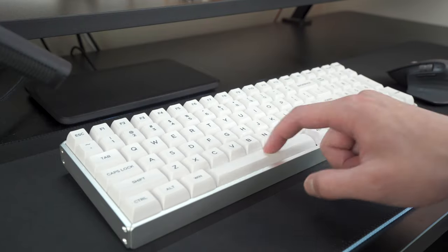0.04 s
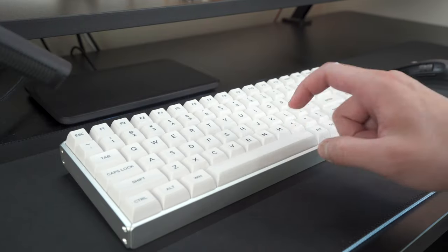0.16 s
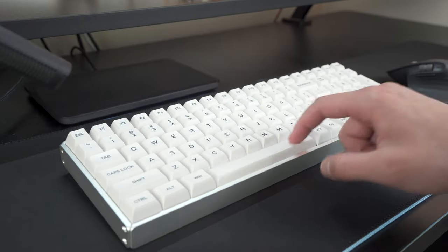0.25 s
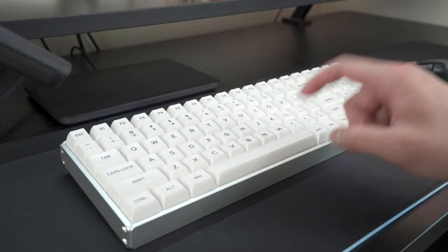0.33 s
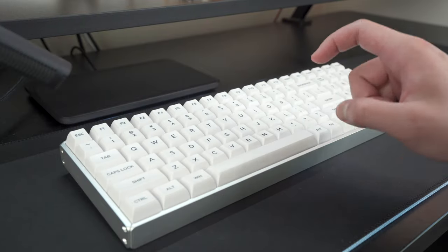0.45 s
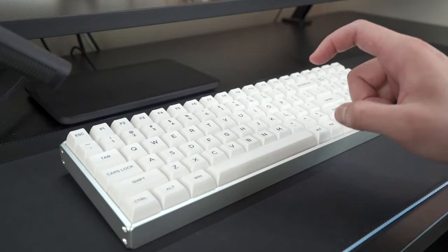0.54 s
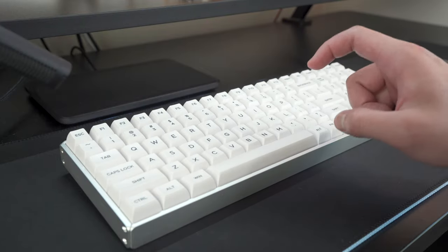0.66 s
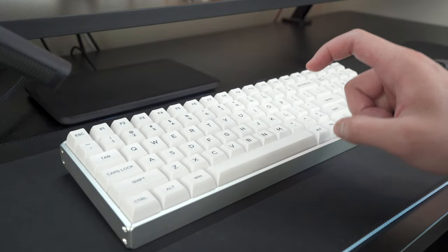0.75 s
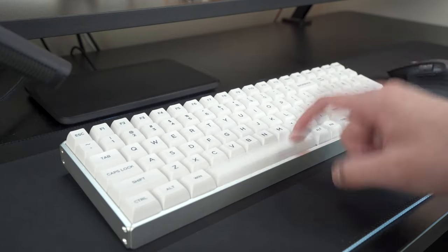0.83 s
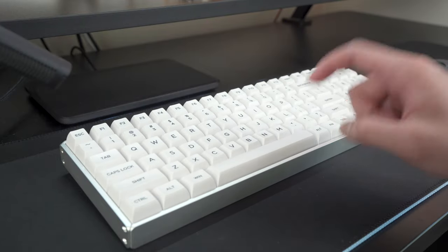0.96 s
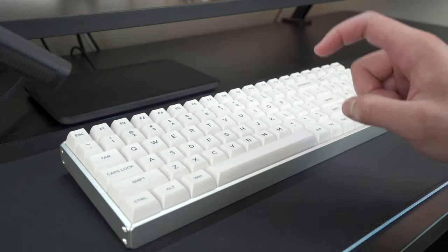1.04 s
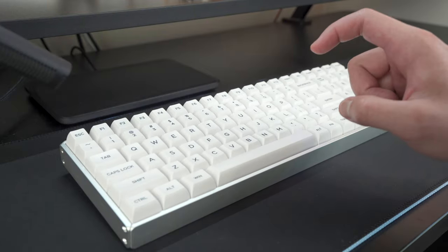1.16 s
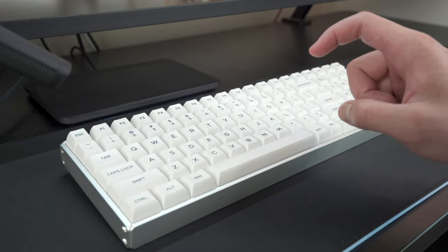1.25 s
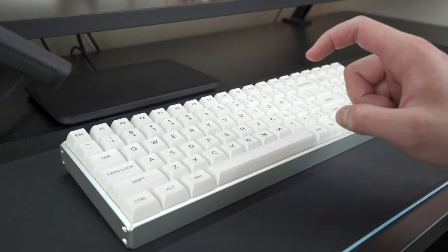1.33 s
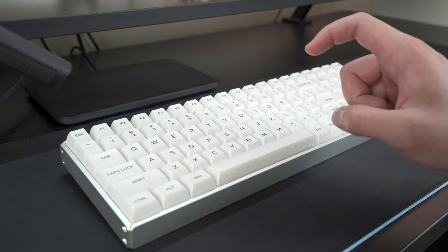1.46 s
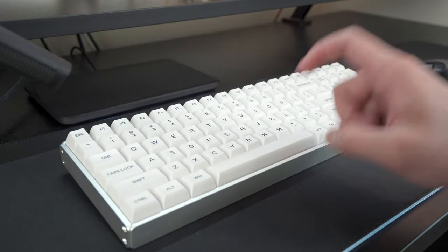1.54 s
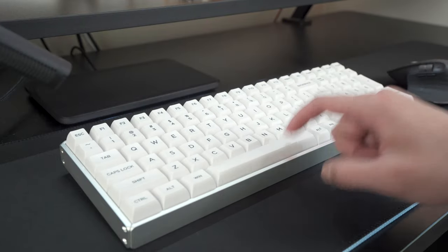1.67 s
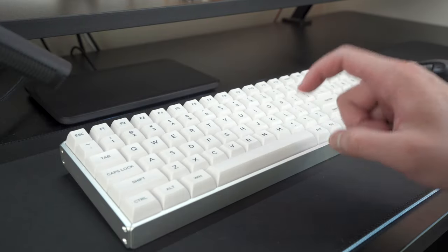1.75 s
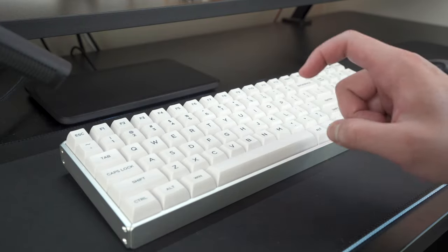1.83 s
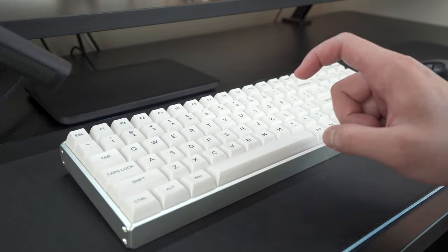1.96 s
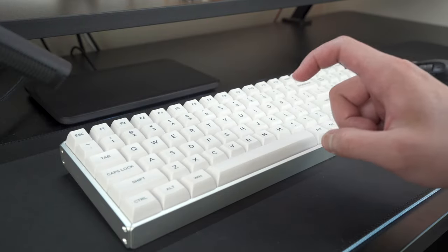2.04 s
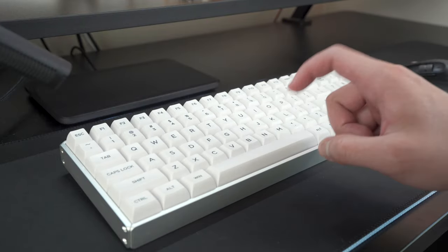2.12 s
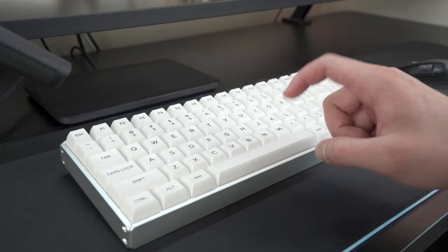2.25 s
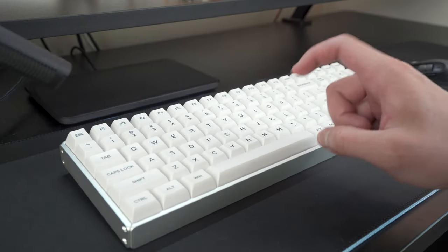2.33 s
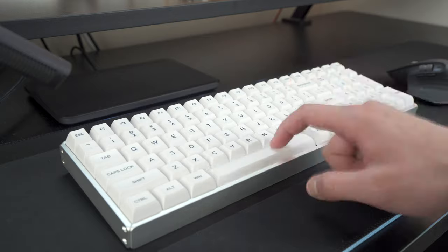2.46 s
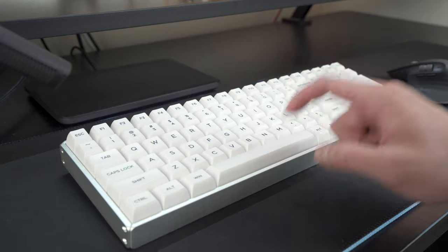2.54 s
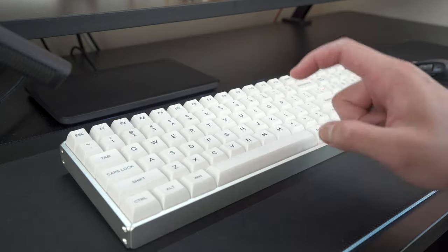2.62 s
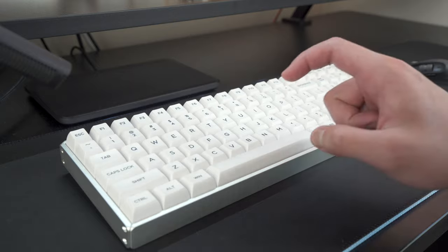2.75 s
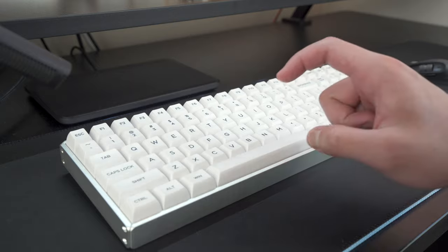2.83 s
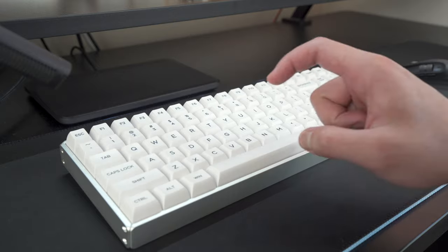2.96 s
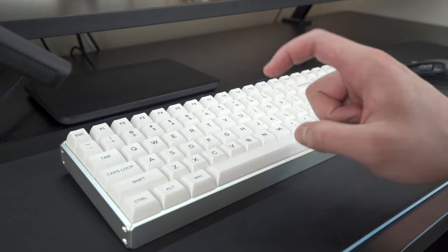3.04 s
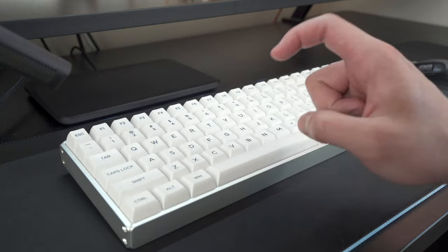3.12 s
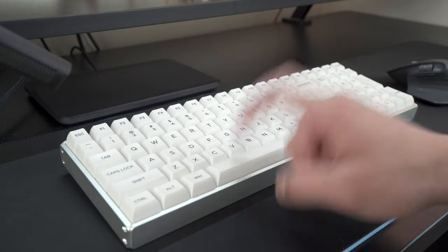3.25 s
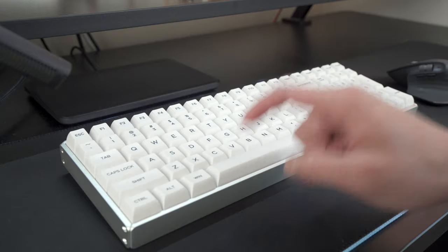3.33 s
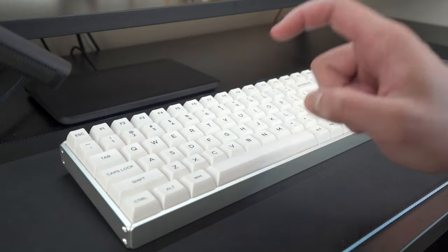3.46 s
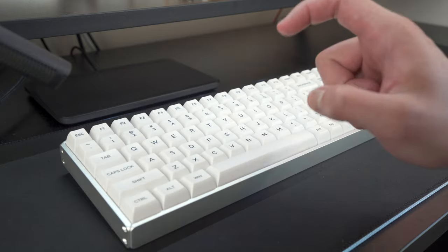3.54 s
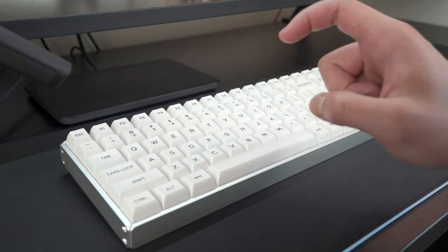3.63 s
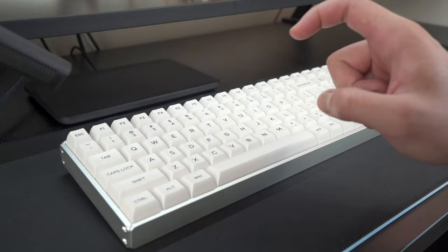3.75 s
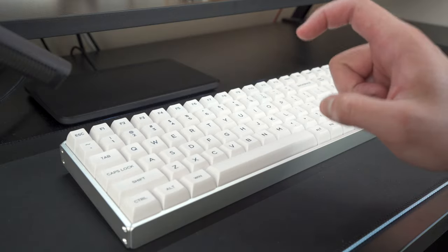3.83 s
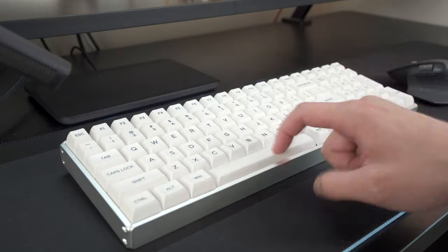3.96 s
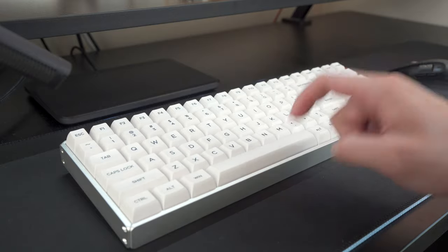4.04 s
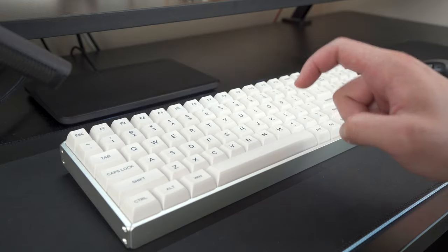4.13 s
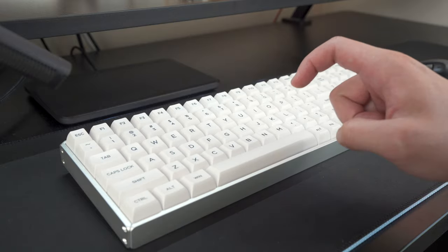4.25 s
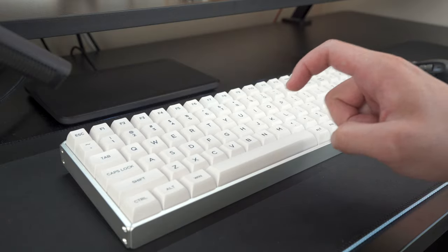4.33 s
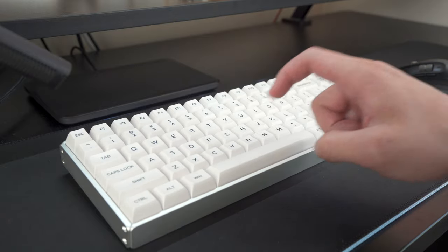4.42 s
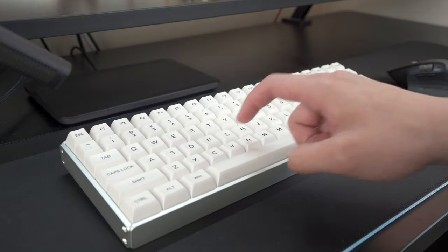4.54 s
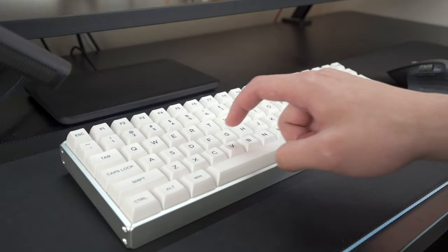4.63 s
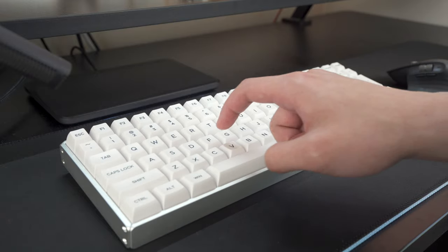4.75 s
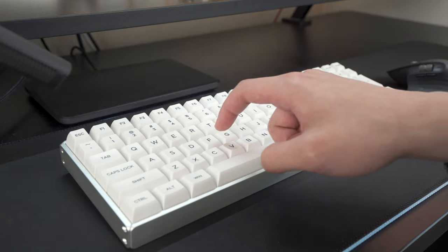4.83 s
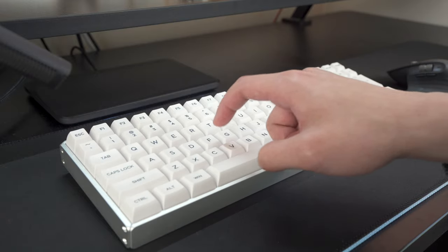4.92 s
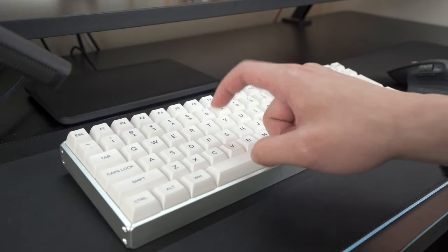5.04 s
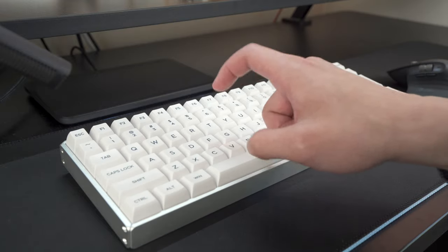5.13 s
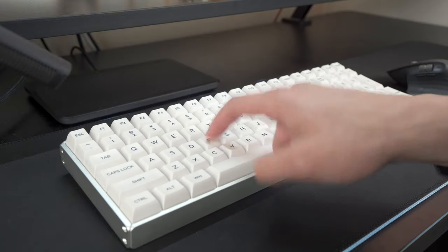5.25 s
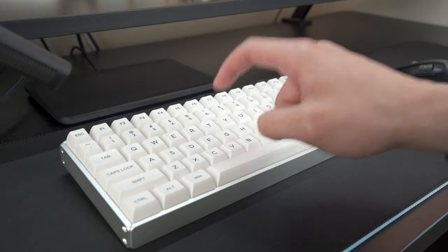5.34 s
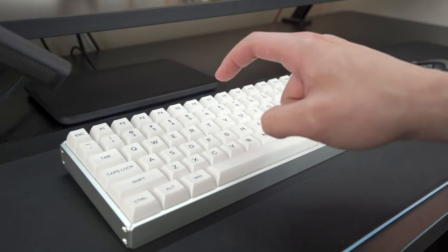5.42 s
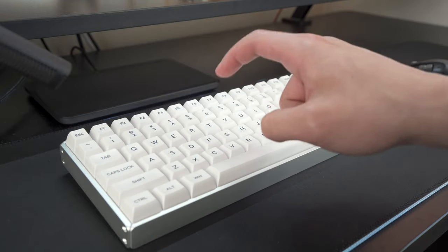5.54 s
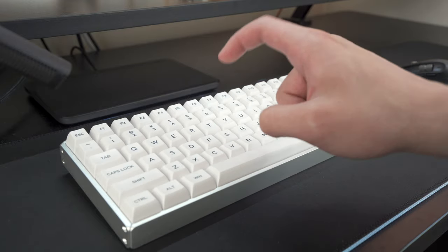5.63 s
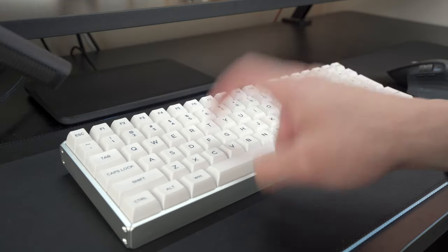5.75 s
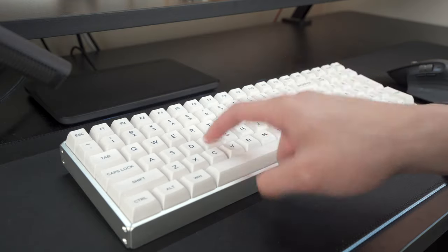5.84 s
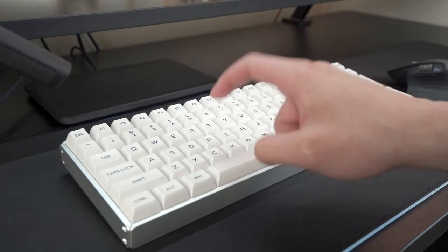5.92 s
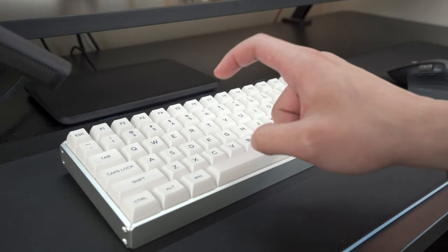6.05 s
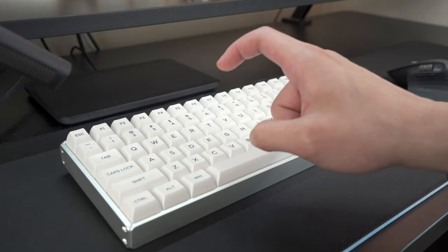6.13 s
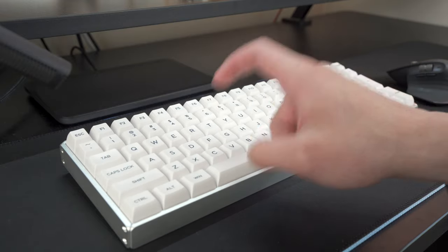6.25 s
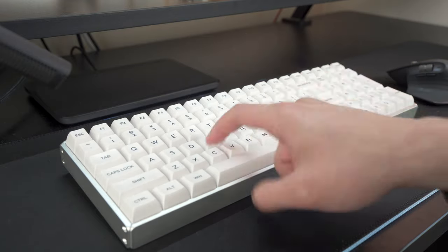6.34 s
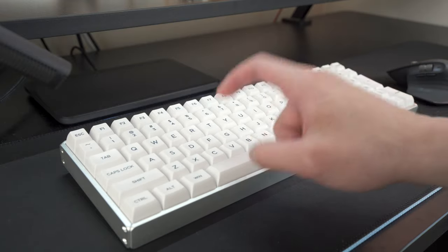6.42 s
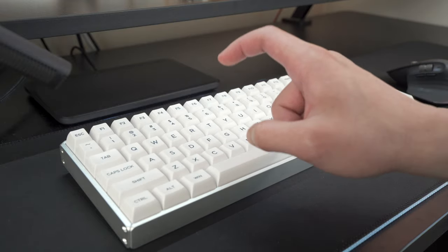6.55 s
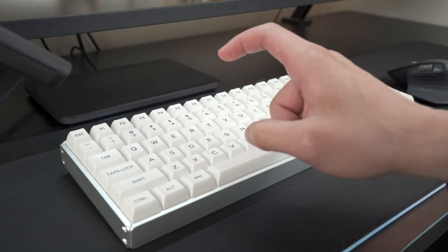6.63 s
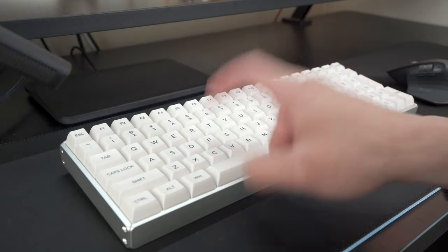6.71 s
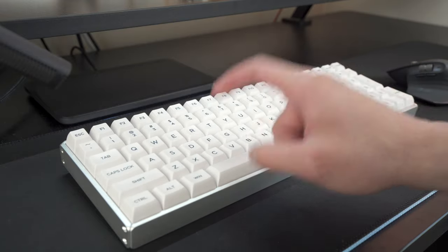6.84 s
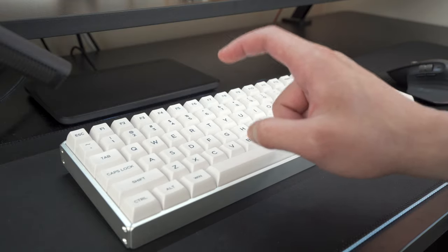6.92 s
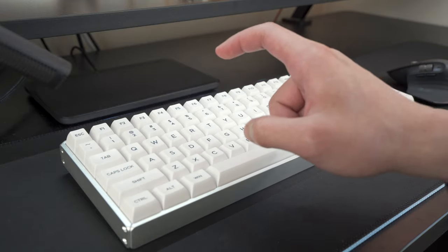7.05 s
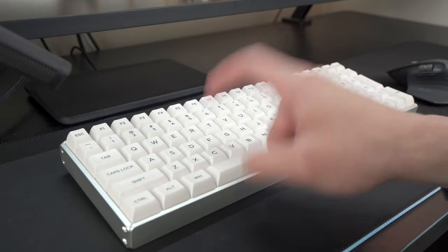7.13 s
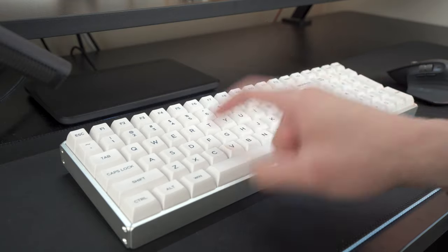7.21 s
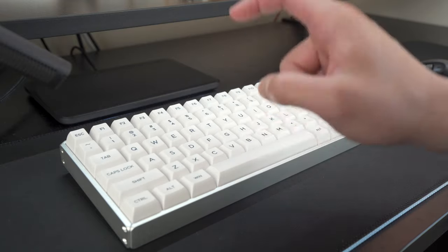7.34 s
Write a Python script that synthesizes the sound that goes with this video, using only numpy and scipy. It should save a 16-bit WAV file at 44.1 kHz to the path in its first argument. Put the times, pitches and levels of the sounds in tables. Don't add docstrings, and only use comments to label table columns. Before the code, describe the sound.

Very close to a metal-cased mechanical keyboard in a quiet room, a finger presses the long bar repeatedly: plastic scrape, hard rattly clack, low desk thump, then a bright snap back with tiny bounces. Then five letter keys sound sharper and tighter. A thin metallic ring lingers after each push, over faint room hum.

```python
import sys
import numpy as np
from scipy import signal
from scipy.fft import rfft, irfft
from scipy.io import wavfile
from scipy.ndimage import uniform_filter1d

SR = 44100
rng = np.random.default_rng(int(sys.argv[2]) if len(sys.argv) > 2 else 0)


def invert_db(level):
    return 10 ** (np.asarray(level, dtype=float) / 20)


def log_audio(samples):
    frames = np.atleast_2d(samples).T
    limited = np.clip(frames, -1, 1)
    pcm = np.round(limited * 32767).astype(np.int16)
    wavfile.write(sys.argv[1], SR, pcm)


N = 325458
LEAD = 2205

# frequency in Hz, level in dB per Hz.
HUM_TONE = [(22, 0), (45, -2), (80, 5), (118, -8), (146, -3.5), (170, -8.5), (220, -9), (370, -10.5),
            (590, -10), (1000, -16), (1250, -13), (1900, -15), (5200, -28), (8000, -37.5), (15700, -40),
            (15900, -61.5)]
# frequency in Hz, t60 in seconds.
CLATTER_DECAY = [(300, 0.228), (2000, 0.0377), (8000, 0.0746), (16000, 0.0005)]
WALL_DECAY = [(200, 0.17), (1500, 0.52), (5000, 0.34), (9000, 0.27), (13000, 0.2), (16000, 0.18)]
# frequency in Hz, level in dB per Hz.
SPREAD_TONE = [(150, -28.5), (400, -25), (550, -5), (1800, 3), (4000, -3), (8500, -15.5), (12000, -12.5),
               (16300, -18.5)]
# frequency in Hz, level in dB, t60 in seconds.
DESK_MODES = [(52, 0, .33), (63, -10, .15), (44, -9, .5), (31, -18, .6), (95, -11, .08), (140, -12, .05)]
BAR_RING_MODES = [(261, 7, .36), (553, -9, 2.4), (590, -7.5, 1.7), (1220, -15, 1.5), (1631, -3, 1.0),
                  (1730, 1, .5), (2191, -1, .25), (2627, -12, .5), (4027, -14, .5), (4980, -16, .7),
                  (8150, -21, .5), (9600, -19, .45)]
KEY_RING_MODES = [(554, -13, 2.4), (1066, -4, .3), (1220, -19, 2.5), (1631, -15, .9), (1717, 0, .5),
                  (2385, -10, .2), (4455, -17, .5), (7210, -14, .35), (8156, -19, .6), (8457, -18, .55),
                  (9335, -18, .55), (9600, -19, .5), (12920, -19, .3), (13000, -19, .3)]
# frequency in Hz, level in dB per Hz.
RUB_TONE = [(120, -23.5), (400, -5.5), (1760, -9.5), (2890, -2.5), (6040, -4), (9390, -11), (12600, -8),
            (16300, -18.5)]
# frequency in Hz, level in dB per Hz.
BAR_DOWN_COLOUR = [(120, -45.5), (400, -30.5), (520, -16), (800, -23), (1300, -3.5), (2050, 0.5),
                   (3000, -6.5), (3700, -9.5), (5100, -3.5), (6300, -9), (7800, -7), (9400, -11),
                   (10900, -13.5), (16300, -22.5)]
KEY_DOWN_COLOUR = [(120, -25), (350, -29), (600, -14), (1790, 1.5), (3300, -6.5), (4840, 3.5), (6700, -7.5),
                   (8410, 4.5), (10700, -6), (11600, -22.5), (14600, -13), (16300, -31)]
BAR_UP_COLOUR = [(120, -42), (350, -26), (800, -21.5), (1300, -5.5), (2070, -4.5), (2700, -8.5),
                 (4030, -9.5), (5000, -9.5), (7810, -1), (10900, -6.5), (11700, -20), (13800, -15.5),
                 (16300, -30)]
KEY_UP_COLOUR = [(120, -57), (200, -53.5), (975, -8.5), (2790, -5.5), (4180, -2.5), (5930, -7.5),
                 (6620, -11), (8260, 2.5), (9050, -8), (11700, -16.5), (14300, -10.5), (16300, -36.5)]
# frequency in Hz, level in dB, t60 in seconds.
BAR_DOWN_BODY = [(260, -8, .12), (487, 2, .05), (545, -7, .04), (615, -4, .045), (1000, -11, .03),
                 (1240, -6, .04), (1350, -7, .04), (1570, -8, .035), (1930, 3, .03), (2075, 5, .035),
                 (2410, -10, .03), (2860, -9, .025), (3950, -9, .02), (5050, -8, .02), (5280, -8, .02)]
KEY_DOWN_BODY = [(514.97, -14, 0.03), (688, -9, 0.029), (1291.9, -1, 0.026), (1763.6, -1.5, .035),
                 (1991.8, -3, 0.046), (2413.2, -4, 0.049), (2947.2, -10.5, 0.049), (3900, -15, 0.032),
                 (5223.7, -8, .035), (5702.5, -10, .04), (8263.1, -13.5, .035)]
BAR_UP_BODY = [(529.78, -9.5, 0.047), (605.56, -15, 0.067), (1044.4, -22.5, .05), (1380, -13, 0.058),
               (1484.9, -13, 0.065), (1703, -12, .06), (2123.3, -0.5, 0.057), (4133.6, -15, 0.032),
               (5140.3, -16, 0.026), (6240, -14, .03), (7082.7, -14, 0.016), (7790, -8, 0.0097),
               (8547, -10, 0.013), (10550, -13.5, 0.0088)]
KEY_UP_BODY = [(700, -7, .04), (850, -3, .06), (980, -3, .06), (1066, -3, .07), (1300, -4, .04),
               (2300, -10, .04), (2830, -14, .04), (3840, -12, .03), (4240, -5, .02), (6840, -16, .04),
               (8300, -8, .04), (9570, -20, .05)]
# start in seconds, length in seconds, level in dB, slips per second.
FINGER_SCUFF = (6.31, .13, -66, 85)
# time in seconds, blow in dB, ring in dB.
BAR_LOOSE = [
    (.8, -12, -3),
    (1.559, -0.5, 1.3005),
    (1.564, -18, 2.5),
    (2.4173, -9, 4.5),
    (2.4175, -6, 3),
    (2.4213, -26, -12),
    (3.2311, -13.5, -2.5),
    (3.8962, -.5, 5),
    (3.9, -6.5, 1),
    (3.9076, -27, -3.5),
]
KEY_LOOSE = [
    (5.152, -8.5, -33),
    (5.2009, -20, -5.5),
    (5.7244, -10, -7),
    (5.7293, -28, 6.5),
    (5.739, -19, 6),
    (6.262, -17, -3.5),
    (6.2733, -20, 4.5),
    (6.6944, -14, 7.5),
    (6.7027, -26.5, -2.5),
]
# time in seconds, blow in dB, first flight in ms, loss at the bounce in dB, desk in dB.
BAR_RISES = [
    (0.0372, 1.5, 13.8, 10, -31),
    (.2291, .5, 14.6, 9, -26.5),
    (0.8408, 3.5, 15.4, 10, -24.5),
    (1.6128, 2.5, 14.9, 9, -24),
    (2.456, 3, 17.5, 9.5, -21),
    (3.2516, 1, 14.7, 16, -29.5),
    (3.9499, 4, 15.5, 12, -25.5),
]
KEY_RISES = [
    (5.2141, -5, 5.5, 16, -32.5),
    (5.7934, -5, 5.6, 13.5, -35),
    (6.3047, -6, 5.5, 34, -32.5),
    (6.7284, -5.5, 3.7, 41, -41.5),
    (7.142, -8, 5.4, 17, -25.5),
]
NEIGHBOUR_RISES = [
    (5.1757, -3.5, 10, 12, -32),
]
# time in seconds, travel in ms, blow in dB, ring in dB, push on the desk in dB.
BAR_STROKES = [
    (-.011, 6, -10, -5, -22.5),
    (0.1827, 9.2, -2.5, -1.5, -23.5),
    (0.7922, 6.6, 7, -3.5, -16.5),
    (1.5537, 5.8, 8, -6.5, -16.5),
    (2.4093, 5.8, 5.5, -2.5, -17),
    (3.2274, 7.5, 2, 2.5, -19.5),
    (3.895, 4.9, 5.5, -4.5, -15.5),
]
KEY_STROKES = [
    (5.1544, 6, 6.9, -2, -17),
    (5.7279, 4, 8.3, 4.5, -17.5),
    (6.2643, 5.3, 4.2, -6.5, -22.5),
    (6.6944, 4.6, 8.3, 0, -22.5),
    (7.1176, 4.6, 4.4, 0, -24),
]


def evened(x):
    return x / np.sqrt(np.mean(x ** 2) + 1e-20)


def read(points, hz):
    f, value = np.transpose(points)
    return np.interp(np.log(hz + 1), np.log(f + 1), value)


def add(mix, s, sound):
    part = mix[round(s * SR) + LEAD:][:len(sound)]
    part += sound[:len(part)]


def through(x, response):
    return signal.fftconvolve(x, response)[:len(x)]


def causal(tone):
    db = np.maximum(read(tone, abs(np.fft.fftfreq(2048, 1 / SR))), -60)
    log_spectrum = np.conj(signal.hilbert(np.log(invert_db(db))))
    h = np.fft.ifft(np.exp(log_spectrum)).real[:1024]
    return h / np.linalg.norm(h)


def modes(table, size=4096):
    t = np.arange(size) / SR
    return sum(invert_db(db - 60 * t / t60) * np.sin(2 * np.pi * hz * t) for hz, db, t60 in table)


def hum():
    frames, hz = N // 512 + 5, np.fft.rfftfreq(2048, 1 / SR)
    real, imaginary, patches = rng.standard_normal((frames, 1025, 3)).T
    patches = evened(uniform_filter1d(uniform_filter1d(patches, 6, 0), 8, 1))
    z = (real + 1j * imaginary) * invert_db(read(HUM_TONE, hz)[:, None] + 1.2 * patches)
    air = signal.istft(z, nperseg=2048, noverlap=1536)[1][:N]
    return invert_db(-53) * evened(air)


def tail(decays, gap_s):
    hz, t, z = signal.stft(rng.standard_normal(SR // 2), SR, nperseg=128)
    fading = z * invert_db(-60 * t / read(decays, hz)[:, None])
    h = signal.istft(fading, SR, nperseg=128)[1]
    return np.r_[np.zeros(round(gap_s * SR)), h / np.linalg.norm(h)]


def reflections(keys):
    sent = 0.38 * keys[0] + invert_db(5) * through(keys[1], causal(SPREAD_TONE))
    near = through(sent, invert_db(-11) * tail(CLATTER_DECAY, 0.0011))
    walls = through(sent, invert_db(-23.5) * tail(WALL_DECAY, 0.0065))
    return near + walls


def desk(push, jolt):
    t = np.arange(SR) / SR
    body = modes(DESK_MODES, size=SR)
    swing = body * (1 - np.exp(-t / .003))
    quick = body * (1 - np.exp(-t / .0015)) * (.3 + .7 * invert_db(-60 * t / 0.19))
    return through(push, swing) + through(jolt, quick)


def long_rings(bar, letter):
    after_bar = invert_db(-49.5) * through(bar, modes(BAR_RING_MODES, size=2 * SR))
    after_letter = invert_db(-47.5) * through(letter, modes(KEY_RING_MODES, size=2 * SR))
    return after_bar + after_letter


def scrape(pressure):
    rub = rng.standard_normal(8192)[:len(pressure)] * pressure
    return evened(through(rub, causal(RUB_TONE)))


def scuff(mix):
    s, length_s, db, slips_hz = FINGER_SCUFF
    t = np.arange(length_s * SR) / SR
    stroke = np.sin(np.pi * (t / length_s) ** .6)
    slips = .6 + np.cos(np.pi * slips_hz * t) ** 4
    hiss = scrape(stroke * slips)
    add(mix, s, invert_db(db) * evened(np.diff(hiss, 2)))


def rattle(ms):
    u = np.arange(2048) / SR * 1000 / max(ms, .05)
    shape = np.exp(-u ** 2) + 0.21 * np.exp(-u / 3)
    x = rng.standard_normal(len(u)) * np.sqrt(rng.exponential(1, len(u))) * shape
    x[0] = -2
    z = rfft(x)
    x = irfft(z / abs(z) ** .8)[:1024] * shape[:1024] ** .3
    return x * np.sqrt(ms) / np.linalg.norm(x)


def strike(mix, s, db, ms, tone, body, body_db):
    hits = rattle(ms)
    low_cut = signal.butter(3, 430, "high", fs=SR)
    ringing = signal.lfilter(*low_cut, signal.fftconvolve(hits, body))
    add(mix[0], s, invert_db(db + 11.5) * signal.fftconvolve(hits, tone))
    add(mix[0], s, invert_db(db + body_db) * ringing)
    add(mix[1], s, invert_db(db) * hits)


def knocks(mix, rows, tone, body, body_db):
    for s, db, ring_db in rows:
        strike(mix, s, db, .46, tone, body, ring_db + body_db)


def returns(mix, low, rows, tone, body, body_db, rattle_ms, dull_db):
    for s, db, flight_ms, loss_db, desk_db in rows:
        rub = scrape(np.arange(700) / 700 + .2)
        add(mix[0], s - 700 / SR, invert_db(db - 41) * rub)
        strike(mix, s, db, rattle_ms, tone, body, body_db)
        add(low, s, -invert_db([desk_db]))
        for flights, losses in ((1, 1), (1.49, 2.1)):
            at = s + flights * flight_ms / 1000
            strike(mix, at, db - losses * loss_db, rattle_ms, tone, body, body_db - dull_db)
            add(low, at, -invert_db([desk_db - 16.5]))


def presses(mix, low, ring, rows, tone, body, body_db, rattle_ms, slide_db):
    for bottom, travel_ms, db, ring_db, desk_db in rows:
        t = np.arange(travel_ms * SR / 1000) / SR
        touch = 0.29 * np.exp(-t / .0004)
        slide = 0.15 + 1.7 * (t / t[-1]) ** 1.4
        add(mix[0], bottom - len(t) / SR, invert_db(desk_db + slide_db) * scrape(touch + slide))
        tightened_ms = rattle_ms * invert_db(-0.42 * db)
        strike(mix, bottom, db, tightened_ms, tone, body, body_db + ring_db)
        add(low, bottom - .004, -invert_db([desk_db]))
        add(ring, bottom, invert_db([14 + desk_db / 2]))


def scene():
    push, jolt, bar, letter = np.zeros((4, N + LEAD))
    keys = np.zeros((2, N + LEAD))
    bar_down = causal(BAR_DOWN_COLOUR), modes(BAR_DOWN_BODY)
    key_down = causal(KEY_DOWN_COLOUR), modes(KEY_DOWN_BODY)
    bar_up = causal(BAR_UP_COLOUR), modes(BAR_UP_BODY)
    key_up = causal(KEY_UP_COLOUR), modes(KEY_UP_BODY)
    presses(keys, push, bar, BAR_STROKES, *bar_down, -18, rattle_ms=3.3, slide_db=-6.5)
    presses(keys, jolt, letter, KEY_STROKES, *key_down, -24.5, rattle_ms=1.1, slide_db=-3)
    returns(keys, push, BAR_RISES, *bar_up, -9.0, rattle_ms=.42, dull_db=4.6)
    returns(keys, jolt, KEY_RISES, *key_up, -19.5, rattle_ms=.8, dull_db=.3)
    knocks(keys, BAR_LOOSE, *bar_down, -8.5)
    knocks(keys, KEY_LOOSE, *key_down, -21.0)
    returns(keys, push, NEIGHBOUR_RISES, *bar_up, -16, rattle_ms=.42, dull_db=4.6)
    scuff(keys[0])
    out = keys[0] + desk(push, jolt) + long_rings(bar, letter) + reflections(keys)
    return (out[LEAD:] + hum())[None]


def roll_off(x):
    return signal.sosfilt(signal.butter(12, 16470, fs=SR, output="sos"), x)


def record(dry):
    clipped = np.clip(dry, -1.05, 1.05)
    lowpass = signal.firwin(255, 16400, window=("kaiser", 8), fs=SR)
    band = signal.oaconvolve(clipped, lowpass[None], "same")
    return roll_off(band)


dry = scene()
out = record(dry)
log_audio(out)
```